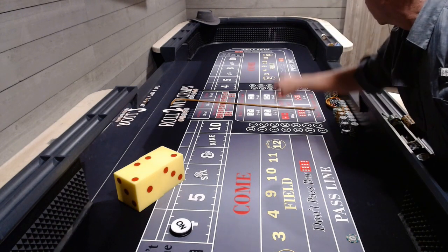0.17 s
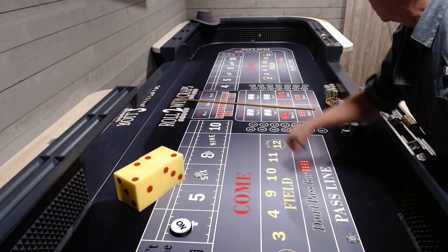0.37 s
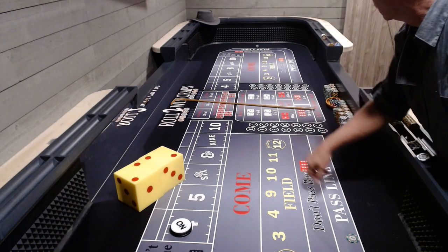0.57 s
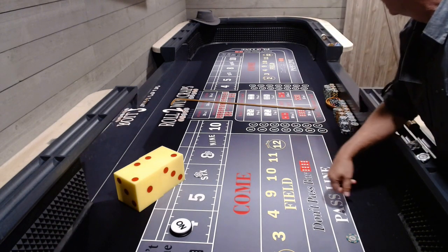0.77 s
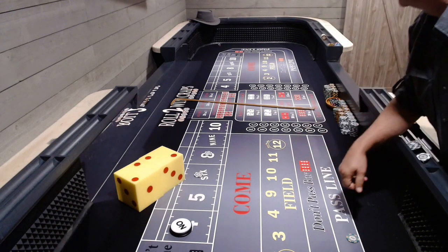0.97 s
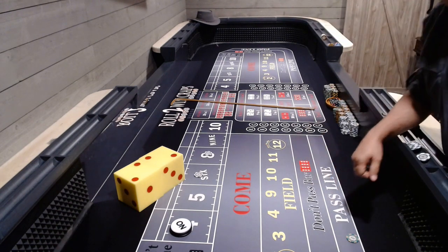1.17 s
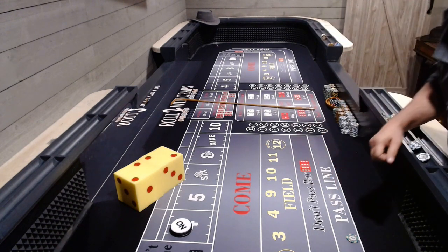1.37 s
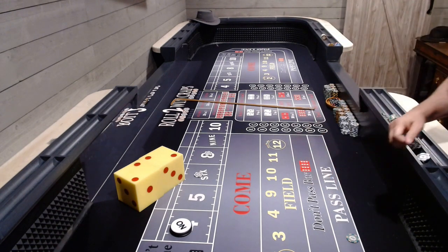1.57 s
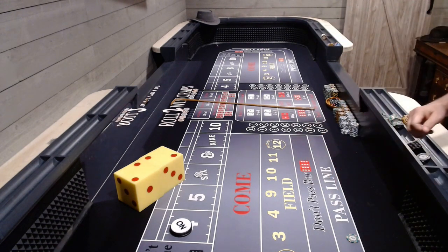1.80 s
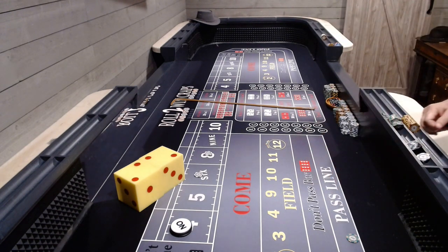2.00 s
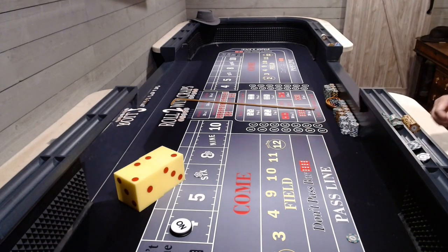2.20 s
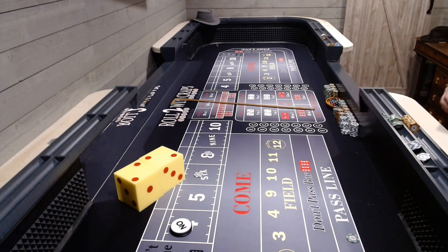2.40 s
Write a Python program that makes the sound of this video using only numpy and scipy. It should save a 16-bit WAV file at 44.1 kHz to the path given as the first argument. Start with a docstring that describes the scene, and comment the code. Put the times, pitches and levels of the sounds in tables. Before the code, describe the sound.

Two dice knock hard on a felt-covered wooden table, bounce and settle, then faint movement follows

```python
"""Two dice on a felt-covered gaming table

Two dice land on a large felt-covered wooden table, one clacks against something hard, and they bounce
and settle. Knocks are dense noise rings; the hollow table booms in damped modes in a small wood-panelled
room. Afterwards the thrower moves away: light clicks and ticks of shaped noise, soft thumps on hollow
wood and a noise rustle of clothes, over room rumble, microphone hiss and a narrow whine."""
import sys
import numpy as np
from scipy import signal
from scipy.fft import rfft, irfft, next_fast_len
from scipy.io import wavfile
from scipy.ndimage import map_coordinates

SR = 44100
rng = np.random.default_rng(int(sys.argv[2]) if len(sys.argv) > 2 else 0)


def persist_wave(psi):
    """Save psi, clipped to +-1, as 16-bit WAV."""
    counts = np.round(np.clip(psi, -1, 1) * 32767).astype(np.int16)
    wavfile.write(sys.argv[1], SR, np.atleast_2d(counts).T)


N = 108045  # length in samples

# modes of the table bed: frequency_hz, relative level_db, t60_s
TABLE_MODES = [(127.3, -2, 0.21), (167.4, -11.5, 0.2), (204.2, 1, 0.19), (260.4, 2, 0.31),
               (313.6, -7, 0.22), (382, 6, 0.15), (473.7, 7, 0.11), (505, -5, 0.26), (554.7, -3, 0.24),
               (630, -17.5, .25), (668.5, 0.5, 0.2), (758, 2.5, 0.26), (848, -6, 0.46), (1061, -2, 0.27)]
LEFT_LEAD_S = .00036  # the left microphone hears the table this much earlier


def amp(db):
    """Decibels to gain."""
    return 10 ** (np.asarray(db) / 20)


def unit(x):
    """Scale to rms 1."""
    return x / np.sqrt(np.mean(x ** 2) + 1e-20)


def along(points, hz):
    """Read a curve of (Hz, value) points on a log frequency axis."""
    point_hz, values = np.transpose(points)
    return np.interp(np.log(hz + 1), np.log(point_hz + 1), values)


def panned(db):
    """Left and right gains for a level difference; positive is louder on the left."""
    return amp(np.array([[.5], [-.5]]) * db)


def filtered(x, response):
    """Shape the spectrum of x by a response of frequency."""
    m = next_fast_len(x.shape[-1] + SR // 4)
    spectrum = rfft(x, m) * response(np.fft.rfftfreq(m, 1 / SR))
    return irfft(spectrum, m)[..., :x.shape[-1]]


def noise(colour, size, alike=None, lead_s=0):
    """Stereo noise of rms 1 whose left-right likeness varies with frequency; the left may lead."""
    # diffuse sound, mostly alike in the bass only: frequency_hz, likeness (-1 to 1)
    diffuse_alike = [(60, 0.85), (300, 0.79), (600, 0.2), (1200, -0.14), (3000, 0), (12000, -0.099)]
    likeness = diffuse_alike if alike is None else alike

    def mid_side(hz):
        turn = np.arccos(np.clip(along(likeness, hz), -1, 1)) / 2
        return colour(hz) * np.array([np.cos(turn), np.sin(turn)])

    mid, side = filtered(rng.standard_normal((2, size)), mid_side)
    left = mid + side
    right = np.roll(mid - side, round(lead_s * SR))
    return unit(np.array([left, right]))


def add(out, s, sound):
    """Mix a sound in at time s."""
    part = out[:, round(s * SR):][:, :sound.shape[-1]]
    part += sound[..., :part.shape[-1]]


def burst(colour, rise_s, t60, room_db, lead_s=0):
    """A short dense ring, and the room's answer dying band by band."""
    # decay of the panelled room: frequency_hz, t60_s
    room_decay = [(60, 2.7), (110, 0.47), (200, 0.34), (500, 0.28), (1500, 0.29), (4000, 0.3),
                  (12000, 0.37)]
    # left-right likeness of the direct sound: frequency_hz, likeness (-1 to 1)
    direct_alike = [(300, 0.9), (1500, 0.29), (4000, 0), (12000, 0.069)]
    room_rise_s = 0.0013  # added to the rise of the contact

    t = np.arange(SR) / SR
    direct = noise(colour, size=SR, alike=direct_alike, lead_s=lead_s)
    direct = direct * amp(-60 * t / t60) * (1 - np.exp(-t / rise_s))

    hz, frames_s, bands = signal.stft(noise(colour, size=SR), SR, nperseg=512)
    decay = amp(-60 * frames_s / along(room_decay, hz)[:, None])
    tail = signal.istft(bands * decay, SR, nperseg=512)[1][:, :SR]
    room_onset = 1 - np.exp(-t / (room_rise_s + rise_s))
    return direct + amp(room_db) * tail * room_onset


def ring(modes, rise_s, size, scatter_db=1):
    """Damped modes, all started by one push; they reach the left microphone first."""
    t = np.maximum(np.arange(size) / SR - np.array([[0], [LEFT_LEAD_S]]), 0)
    tones = 0
    for hz, db, t60 in modes:
        level_db = db + rng.normal(0, scatter_db)  # each push excites the modes a little differently
        tones = tones + amp(level_db - 60 * t / t60) * np.sin(2 * np.pi * hz * t)
    return tones * (1 - np.exp(-t / rise_s))


def background():
    """Room rumble and microphone hiss as shaped noise, and a narrow noise band as electronic whine."""
    # spectrum of rumble and hiss: frequency_hz, relative level_db
    floor_colour = [(20, -7.5), (30, 5), (45, -6), (60, -7.5), (100, -20), (125, -14.5), (300, -23.5),
                    (1000, -27.5), (4000, -28.5), (9000, -28.5), (12000, -26.5), (14000, -25.5),
                    (15300, -19.5), (16000, -35.5)]
    # left-right likeness of the floor: frequency_hz, likeness (-1 to 1)
    floor_alike = [(30, 0), (60, 0.85), (130, .5), (300, 1), (1400, 0)]
    floor_db, hiss_pan_db = -54.5, 1.5  # hiss pan as at 8 kHz
    whine_hz, whine_width_hz, whine_db, whine_pan_db = 12900, 140, -66, 14.5

    floor = noise(lambda hz: amp(along(floor_colour, hz)), size=N, alike=floor_alike)
    # the hiss leans further left towards the treble
    floor = filtered(floor, lambda hz: panned(hiss_pan_db * np.minimum(hz / 8000, 2)))
    whine = noise(lambda hz: 1 / (1 + ((hz - whine_hz) / whine_width_hz) ** 2), size=N)
    return amp(floor_db) * floor + amp(whine_db) * panned(whine_pan_db) * whine


def sway():
    """The whole table rocks on in a few deep, beating modes."""
    # deep swells of the table's rocking; the last, faint one prolongs the low ring: start_s, level_db
    sways = [(0.22, -26), (0.519, -44.5), (.68, -46.5), (.94, -52.5)]
    # deep modes of the whole table: frequency_hz, relative level_db, t60_s
    sway_modes = [(53.8, -11.5, 3.4), (70.8, 6.5, 0.36), (76.7, -6, 1.58), (89.5, 8, 0.5)]
    out = np.zeros((2, N))
    for s, db in sways:
        add(out, s, amp(db) * ring(sway_modes, rise_s=.005, size=2 * SR))
    return out


def boards(hz):
    """Colour of the table: distinct peaks at its modes in the bass, an even crowd of them higher up."""
    # dense ring of the boards: frequency_hz, relative level_db
    board_colour = [(25, -55), (50, -42), (85, -11.5), (150, -8), (300, 0), (500, 0.5), (800, -2.5),
                    (1200, -3.5), (1750, -6.5), (2100, -9), (2600, -12.5), (3500, -17), (8000, -14.5),
                    (15000, -8)]
    peak_width_hz, valley_db = 11, -7.5  # valley against peak, in the bass
    peaks = sum(1 / (1 + ((hz - mode[0]) / peak_width_hz) ** 2) for mode in TABLE_MODES)
    bass = 1 / (1 + (hz / 800) ** 4)
    # half the valley depth is given back, so peaks rise and valleys fall alike
    valleys = (1 - np.minimum(peaks, 1) - .5) * bass
    return amp(along(board_colour, hz) + valley_db * valleys)


def landings():
    """Each die pushes the table bed through the felt; the softer the contact, the duller the knock."""
    # dice on the felt: start_s, level_db, contact_cutoff_hz, relative boom_db, rise_s, pan_db
    dice_hits = [(0.2209, -21.5, 2050, -4, .0006, 0), (0.2264, -15, 390, -2, 0.00067, 0),
                 (0.2332, -11.5, 1620, -4.5, 0.00071, 0.5), (0.2478, -18, 660, -6.5, 0.00067, -3.5),
                 (0.2876, -28.5, 886, -14.5, 0.0012, -2), (0.2974, -28, 1800, -31, 0.0012, 4),
                 (.517, -34, 367, 1, 0.0014, 1.5), (.543, -39.5, 365, -3, 0.0019, -1),
                 (0.668, -43.5, 2560, -18, 0.0055, -2.5), (.685, -45.5, 1916, -14, 0.0027, 1),
                 (0.817, -58.5, 500, -1, 0.002, -7)]
    contact_order = 2.27  # steepness of the contact's treble loss
    table_db = -5.5  # added to every boom
    out = np.zeros((2, N))
    for s, db, cut_hz, boom_db, rise_s, pan_db in dice_hits:
        soft = lambda hz: 1 / np.sqrt(1 + (hz / cut_hz) ** (2 * contact_order))
        knock = burst(lambda hz: boards(hz) * soft(hz), rise_s, t60=0.082, room_db=-4, lead_s=LEFT_LEAD_S)
        modes = [(hz, level + 20 * np.log10(soft(hz)), t60) for hz, level, t60 in TABLE_MODES]
        # the boom swells in more slowly than the knock
        boom = amp(boom_db + table_db) * ring(modes, rise_s + 0.0028, size=SR)
        add(out, s, amp(db) * panned(pan_db) * (knock + boom))
    return out


def clicks():
    """Hard contacts: one resonance of noise with a bright edge; two of them ring on briefly."""
    # hard contacts: start_s, level_db, centre_hz, width_octaves, edge_db (before its slopes),
    # t60_s, room_db, pan_db
    contacts = [(.2210, -13.5, 1610, 0.15, -39, 0.016, -13.5, 0.5),
                (0.2311, -18.5, 1707, .22, -40, 0.023, -15, 2.5),
                (.2970, -20, 2100, 0.75, -12, 0.019, -10, 0),
                (0.325, -33.5, 2300, 0.8, -4.5, 0.055, -19, -2),
                (.518, -43.5, 1800, 0.6, -13, 0.06, -4, -2), (1.182, -35.5, 3560, 0.83, -9, 0.035, -14, 5),
                (2.151, -41, 1430, 0.89, -19, 0.052, -3, -3.5),
                (2.186, -47.5, 1400, 1.1, -11.5, 0.061, -28, 4)]
    # the hardest clack, die against table end: frequency_hz, relative level_db, t60_s
    die_modes = [(610, 10.5, 0.11), (2510, -3, 0.061), (2776, -3, 0.055)]
    # a small hard piece, probably a chip: frequency_hz, relative level_db, t60_s
    chip_modes = [(980, -3, .03), (2900, 0, .045), (3780, -3, .035), (5700, -4, .035)]
    out = np.zeros((2, N))
    for s, db, centre_hz, width_oct, edge_db, t60, room_db, pan_db in contacts:
        peak = lambda hz: np.exp(-.5 * (np.log2((hz + 1) / centre_hz) / width_oct) ** 2)
        edge = lambda hz: amp(edge_db) * hz / (hz + 200) / np.hypot(1, hz / 9000)
        click = burst(lambda hz: peak(hz) + edge(hz), .0004, t60, room_db)
        add(out, s, amp(db) * panned(pan_db) * click)
    # start_s, level_db, modes
    for s, db, modes in (.2968, -28.5, die_modes), (1.1828, -40.5, chip_modes):
        add(out, s, amp(db) * ring(modes, rise_s=0.00038, size=SR // 4))
    return out


def thumps():
    """Dull bumps on hollow wood: a few low modes in a puff of noise."""
    # soft low bumps: start_s, level_db
    bumps = [(0.694, -35.5), (1.179, -49), (1.551, -41.5), (1.642, -45), (1.855, -41.5)]
    # spectrum of the puff: frequency_hz, relative level_db
    puff_colour = [(30, -26), (75, -9.5), (115, 0.5), (180, -2), (270, -13), (420, -21), (1000, -28),
                   (4000, -48)]
    # modes of the hollow wood: frequency_hz, relative level_db, t60_s
    wood_modes = [(102, -4, 0.42), (123, -4, 0.31), (153, -5.5, .18), (226.6, -11.5, 0.25),
                  (377, -19.5, 0.17)]
    out = np.zeros((2, N))
    for s, db in bumps:
        puff = burst(lambda hz: amp(along(puff_colour, hz)), rise_s=0.0019, t60=.1, room_db=-6.5)
        add(out, s, amp(db) * (ring(wood_modes, rise_s=0.0034, size=SR) + puff))
    return out


def clothes():
    """A faint, uneven noise rustle as the thrower straightens up, with one airy swish of a sleeve."""
    # course of the rustle: time_s, level_db (before the flutter)
    rustle_course = [(1.051, -66.5), (1.199, -55), (1.38, -53), (1.55, -57), (1.67, -56.5), (1.75, -51),
                     (1.86, -60.5), (1.93, -51.5), (1.98, -64), (2.02, -52), (2.1, -69.5), (2.349, -59.5),
                     (2.44, -50.5)]
    # spectrum of the cloth: frequency_hz, relative level_db
    cloth_colour = [(100, 1), (300, 0.5), (500, 1), (900, -2), (2500, -3.5), (6000, -7.5), (14000, -3.5)]
    swish_s, swish_width_s, swish_db = 1.73, .03, -54  # peak time, half-width at half gain, peak level

    t = np.arange(N) / SR
    s, db = np.transpose(rustle_course)
    # random unevenness, 60 points a second
    flutter = amp(1.5 * map_coordinates(rng.standard_normal(N // 100), [t * 60]))
    rustle_gain = amp(np.interp(t, s, db, left=-90))
    rustle = rustle_gain * noise(lambda hz: amp(along(cloth_colour, hz)), size=N)
    swish_gain = amp(swish_db) / (1 + ((t - swish_s) / swish_width_s) ** 2)
    swish = swish_gain * noise(lambda hz: hz / np.hypot(hz, 10000), size=N)
    return flutter * (rustle + panned(2.4) * swish)


def ticks():
    """Thin, very high ticks: short noise bursts, a little to the left."""
    # high ticks: start_s, level_db
    tick_hits = [(1.910, -37.5), (2.151, -36), (2.234, -35)]
    # their spectrum: frequency_hz, relative level_db
    tick_colour = [(500, -43), (6000, -25), (11000, -3), (15000, 0.5)]
    out = np.zeros((2, N))
    for s, db in tick_hits:
        tick = burst(lambda hz: amp(along(tick_colour, hz)), rise_s=0.00055, t60=0.019, room_db=-14.5)
        add(out, s, amp(db) * panned(4) * tick)
    return out


def scene():
    """Dice, small movements and the quiet room; the knocks carry little of the deepest bass."""
    low_cut_hz = 52
    low_cut = signal.butter(3, low_cut_hz, "high", fs=SR, output="sos")
    knocks = signal.sosfilt(low_cut, landings() + thumps())
    return background() + sway() + knocks + clicks() + clothes() + ticks()


def record(dry):
    """The recorder keeps nothing above its band limit."""
    top_hz = 15950
    return filtered(dry, lambda hz: hz < top_hz)


dry = scene()
out = record(dry)
persist_wave(out)
```